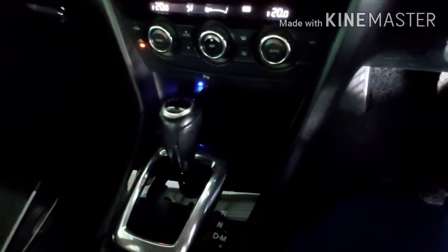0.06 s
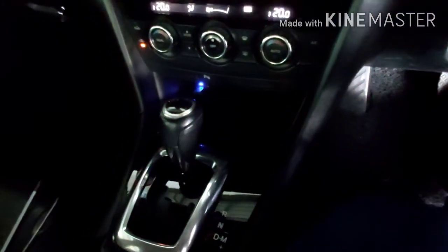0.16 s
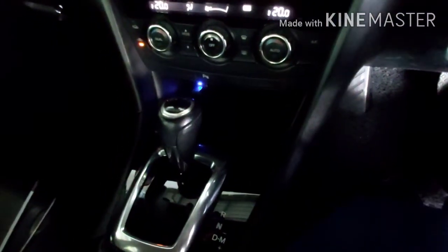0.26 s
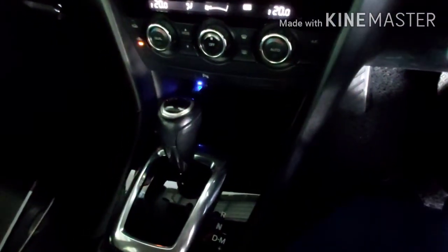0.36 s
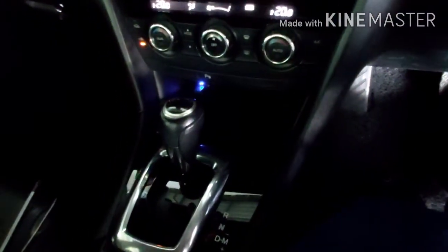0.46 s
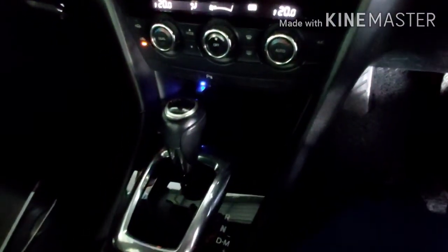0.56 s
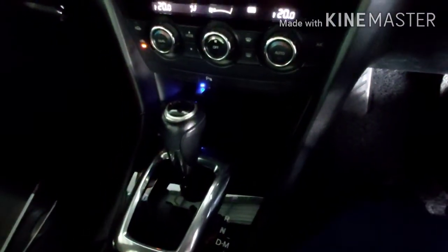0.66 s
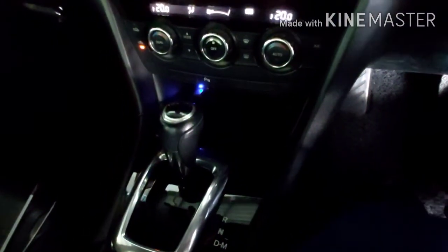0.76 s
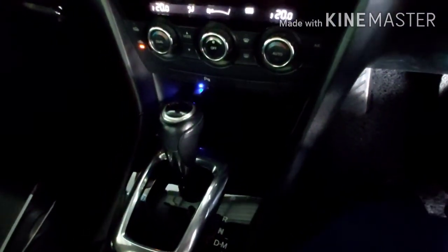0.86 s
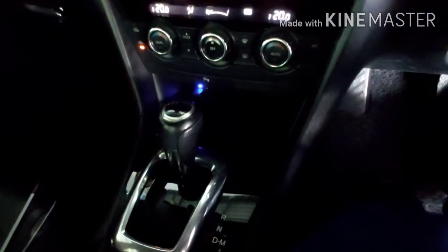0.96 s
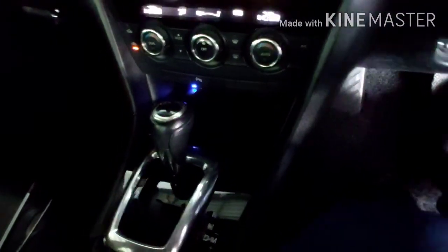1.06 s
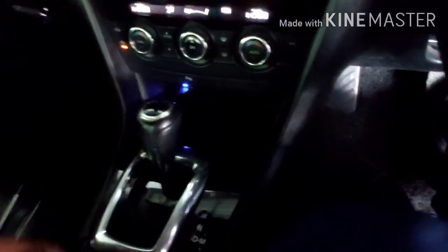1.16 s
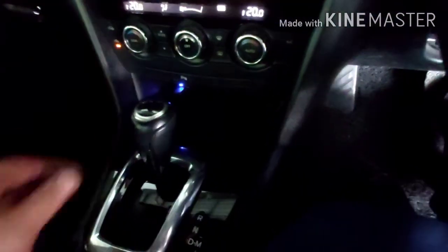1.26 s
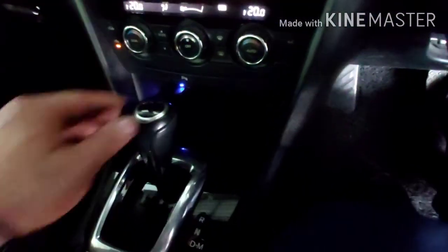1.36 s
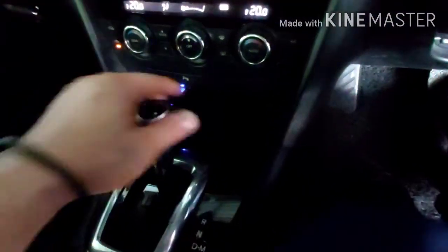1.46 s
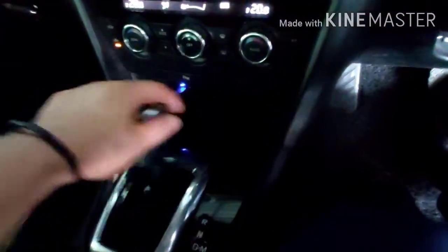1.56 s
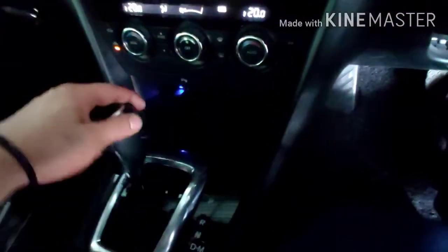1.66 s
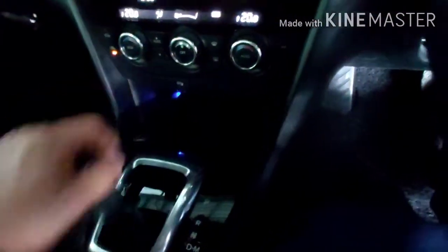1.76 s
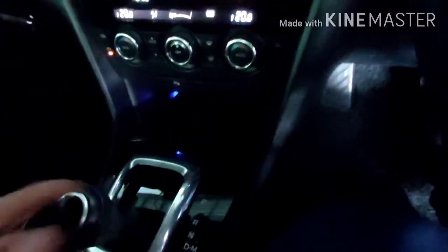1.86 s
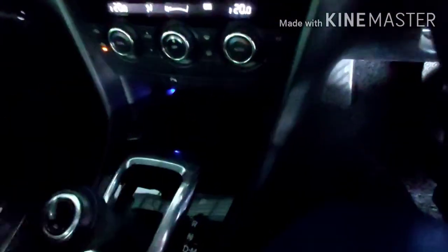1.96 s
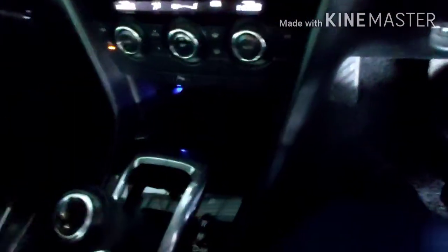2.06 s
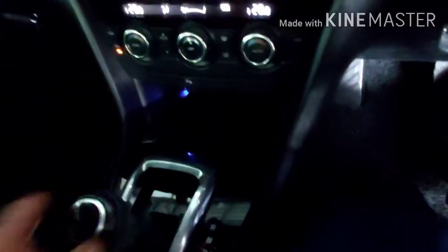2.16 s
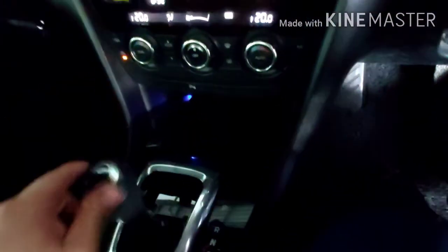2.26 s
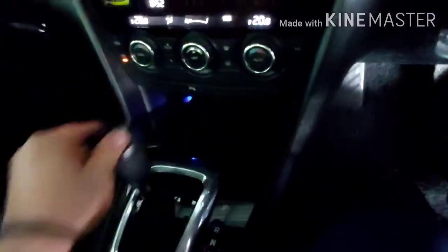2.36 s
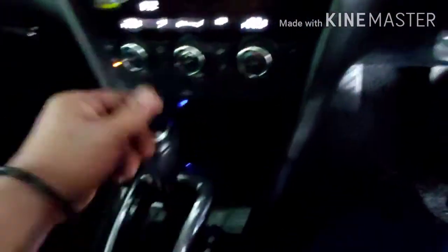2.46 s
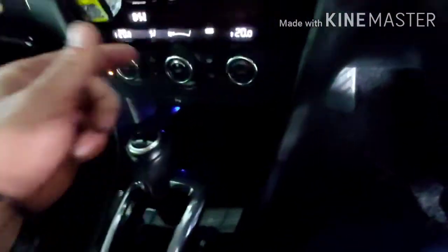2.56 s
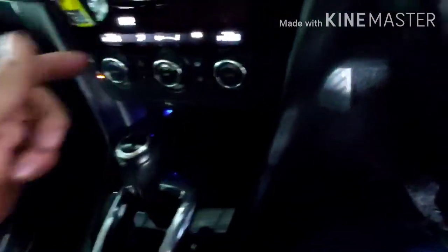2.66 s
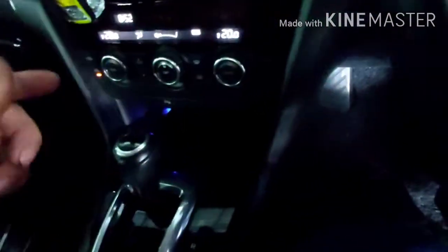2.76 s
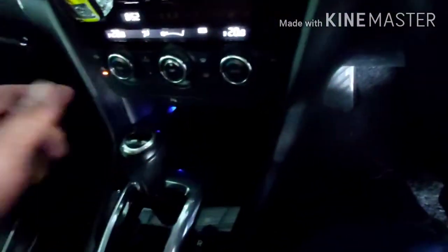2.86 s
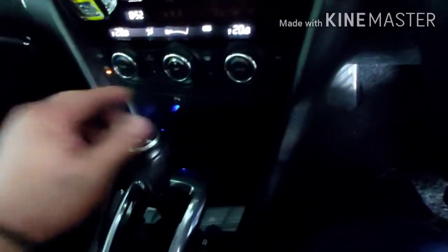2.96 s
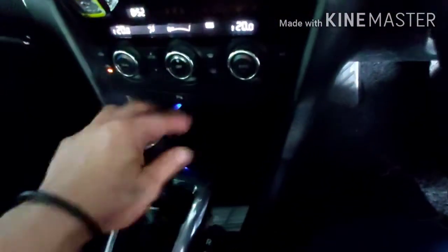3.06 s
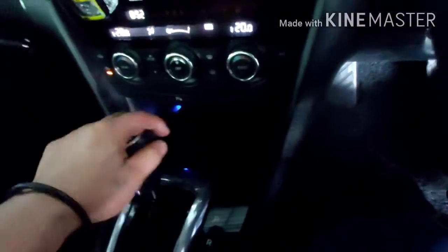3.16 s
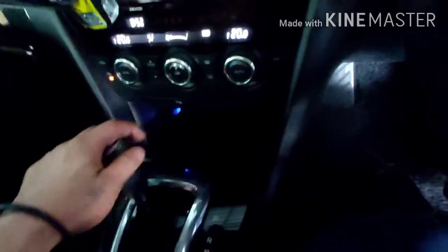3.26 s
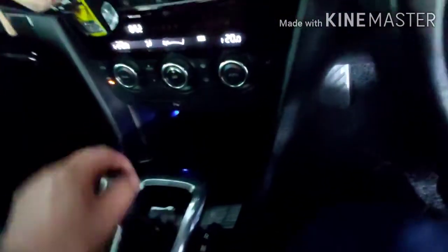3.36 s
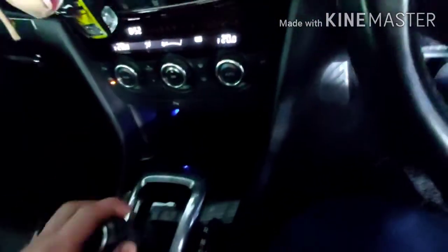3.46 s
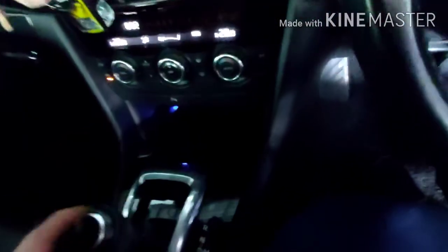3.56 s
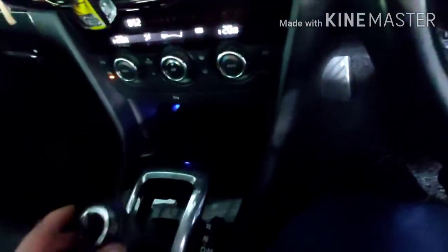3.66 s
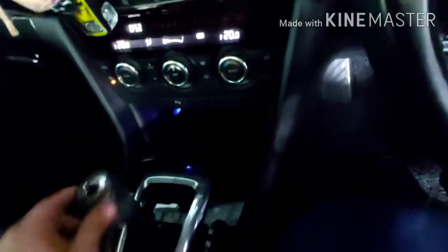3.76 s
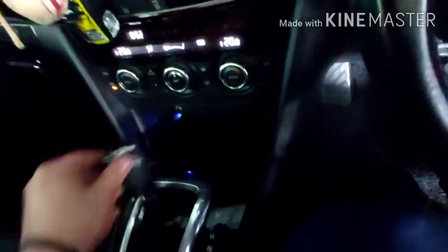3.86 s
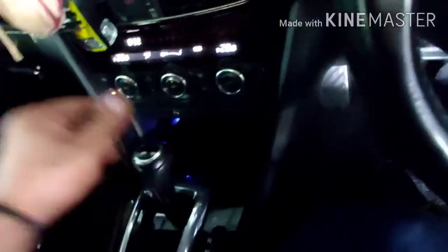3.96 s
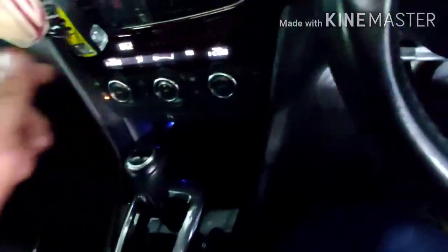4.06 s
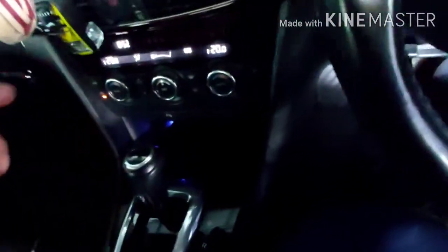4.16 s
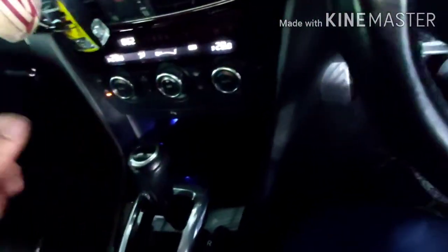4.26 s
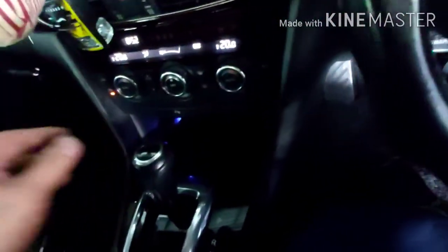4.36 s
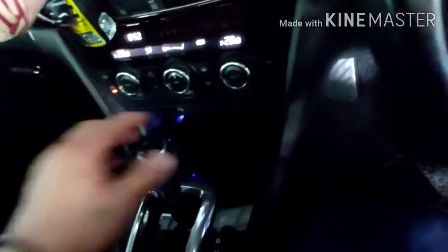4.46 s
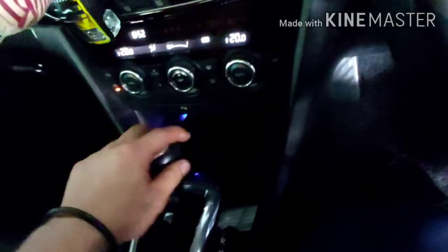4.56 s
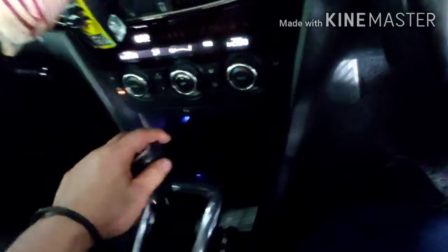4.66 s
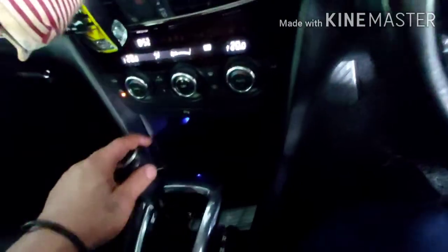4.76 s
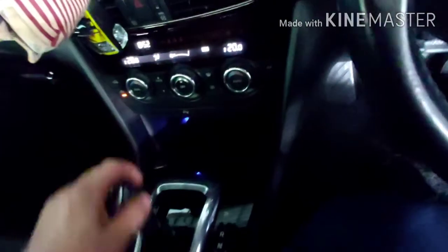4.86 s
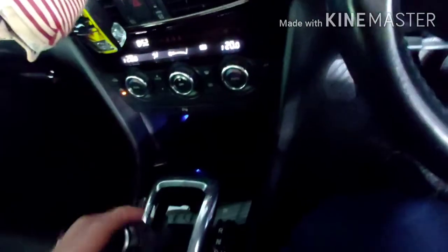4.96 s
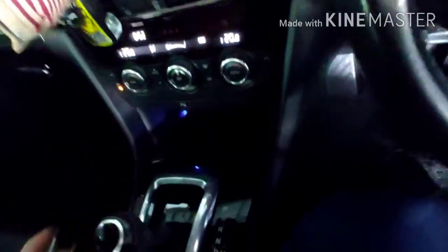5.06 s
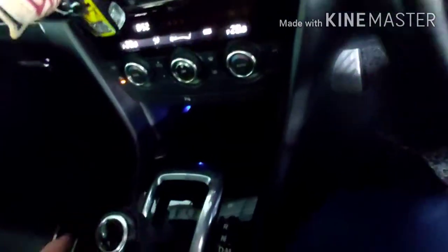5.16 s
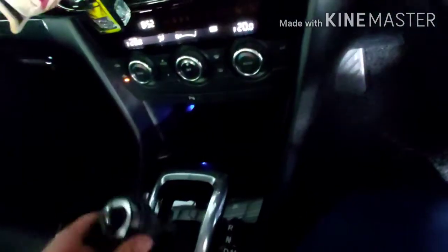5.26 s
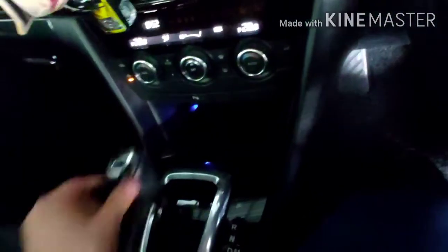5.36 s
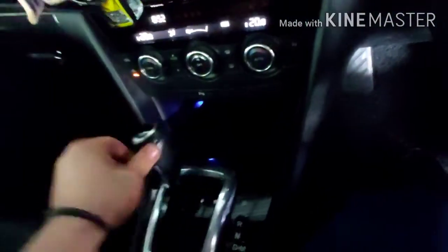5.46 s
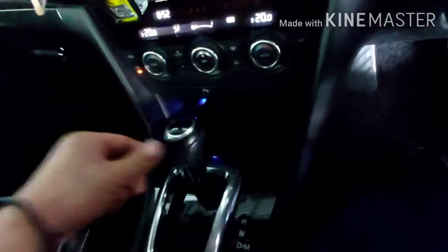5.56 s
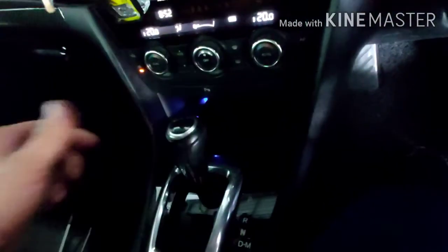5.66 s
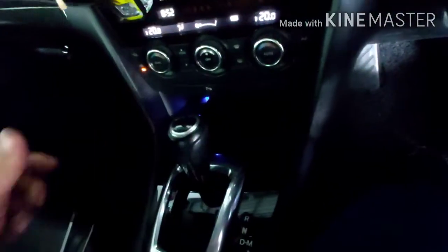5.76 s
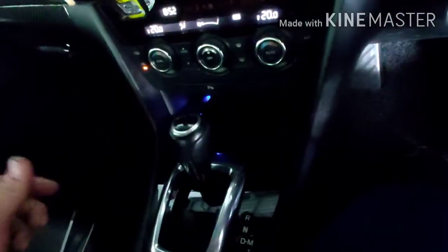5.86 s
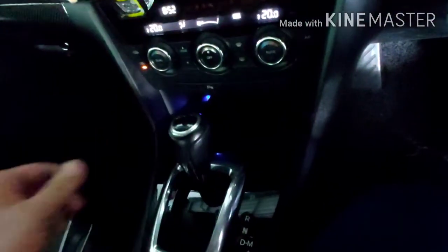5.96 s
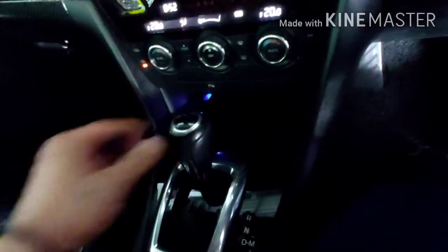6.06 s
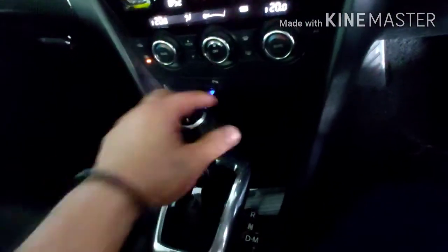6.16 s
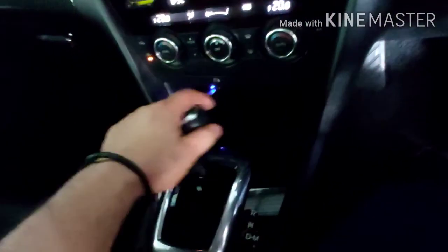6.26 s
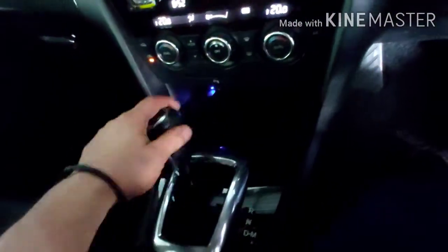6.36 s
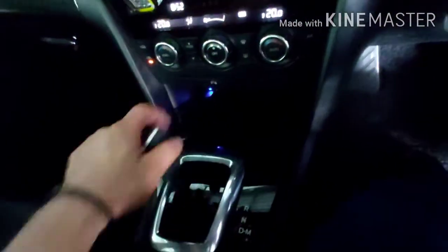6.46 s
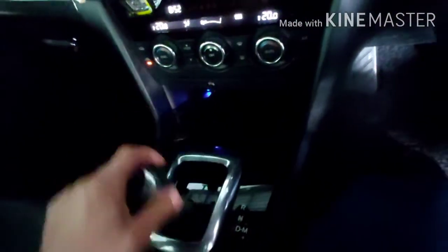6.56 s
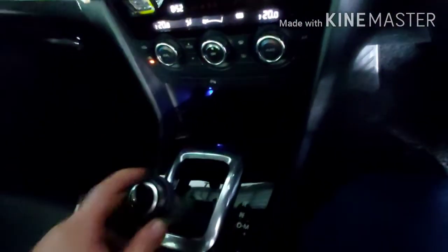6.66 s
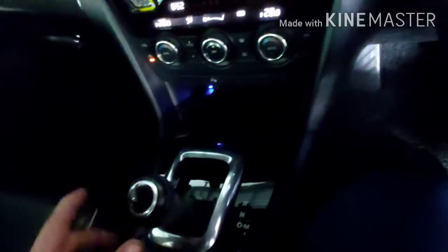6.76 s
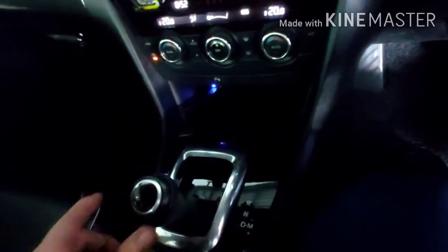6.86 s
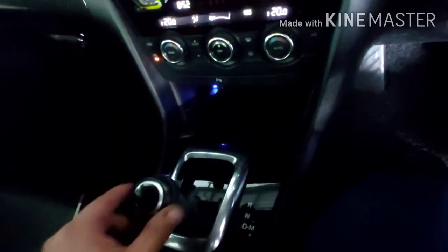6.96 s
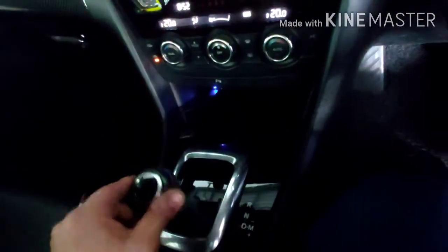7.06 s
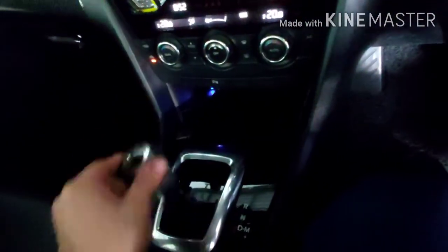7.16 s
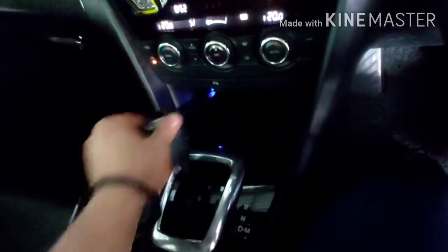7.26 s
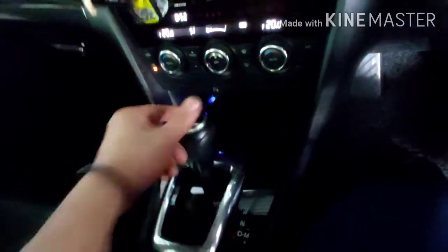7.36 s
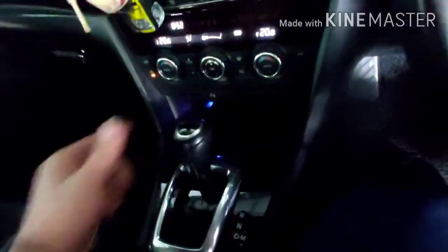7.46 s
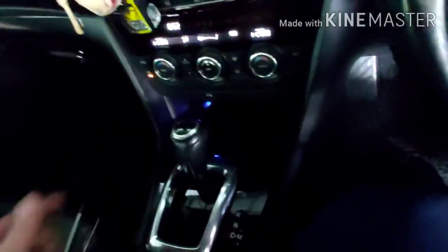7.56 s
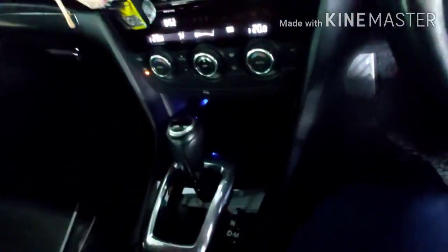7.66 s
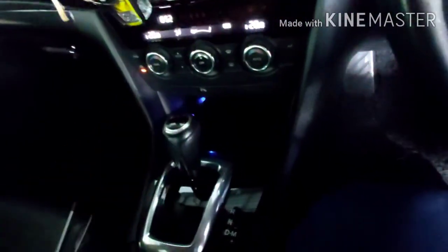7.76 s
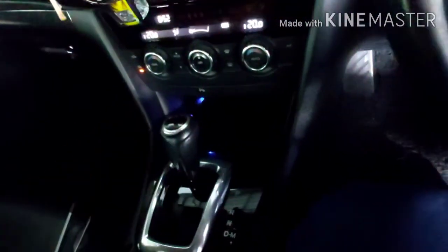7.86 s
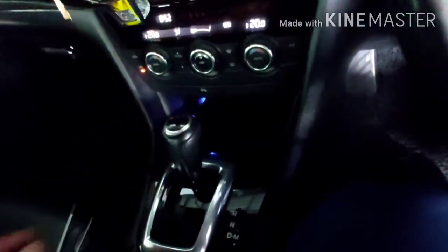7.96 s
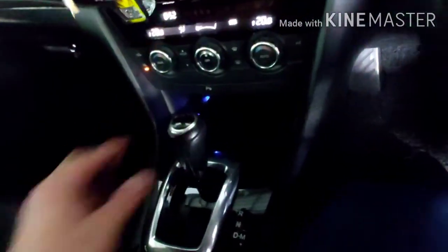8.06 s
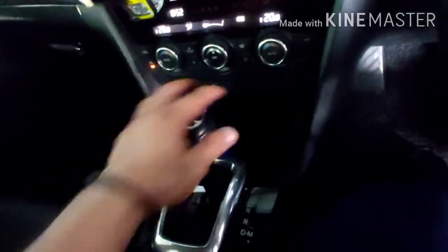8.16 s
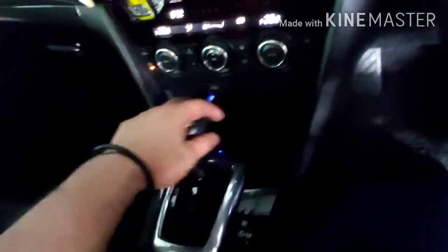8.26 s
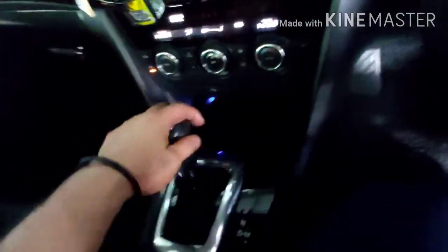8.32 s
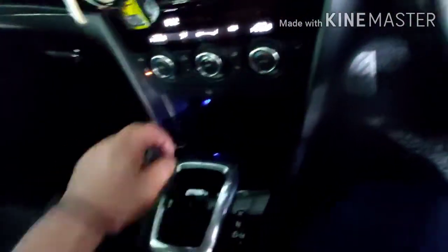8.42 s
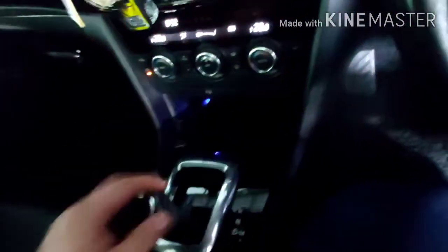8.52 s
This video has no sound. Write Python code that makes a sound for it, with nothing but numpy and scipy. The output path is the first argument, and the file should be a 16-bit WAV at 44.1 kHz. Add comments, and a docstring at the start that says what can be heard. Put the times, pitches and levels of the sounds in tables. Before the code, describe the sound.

A car idles quietly, its low, slightly wavering engine hum mixed with soft ventilation air in a small, dry cabin. For the first second there is only this and a faint sleeve rustle, then tiny dry ticks at 1.1 and 1.5 seconds. At about 1.6 the lock button clicks and the gear lever is pulled back: a quick plastic clatter over notches, a short gritty scrape and a firm knock at 1.85. It is pushed forward at 2.3, clacking into park at 2.4. The same pull and return follow at 3.4 and 3.8 to 3.9, 4.85 to 4.95 and 5.3 to 5.5, then 6.5 to 6.6 and 7.2 to 7.3. Between strokes only hum and faint cloth remain. A last pull begins around 8.4 and hits its stop just before the end at 8.6. Clacks are close, bright-edged and short, with low thumps and brief boom.

```python
"""Plastic clacks and knocks as an automatic gear lever is pulled back and pushed forward in an idling car.
The lock button clicks; the plunger lifts out of park, scrapes over a notched gate and hits the end stop.
Contacts are shaped noise (clack, snap) plus decaying sines (trim, shaft, housing, then console); the cabin booms.
A sleeve rustles as filtered noise. The engine hums as wavering harmonics over ventilation air.
A phone close by hears it through two ports in the small, dead cabin."""
import sys
import numpy as np
from scipy import signal
from scipy.fft import rfft, irfft, next_fast_len
from scipy.io import wavfile
from scipy.ndimage import uniform_filter1d

SR = 44100
rng = np.random.default_rng(int(sys.argv[2]) if len(sys.argv) > 2 else 0)


def pcm_store(signal):
    """Save signal as 16-bit PCM."""
    levels = np.round(np.clip(np.atleast_2d(signal), -1, 1) * 32767)
    wavfile.write(sys.argv[1], SR, levels.astype(np.int16).T)


N = 378819
TIME_S = np.arange(N) / SR
RING_S = np.arange(int(0.18 * SR)) / SR


def amp(db):
    """Decibels to gain."""
    return 10 ** (np.asarray(db) / 20)


def unit(x):
    """Scale to rms 1."""
    return x / np.sqrt(np.mean(x ** 2))


def unit_blow(x):
    """Scale a ring to the energy of 10 ms at rms 1."""
    return x * np.sqrt(0.01 * SR / np.sum(x ** 2))


def fade(t60_s):
    """Exponential decay, 60 dB per t60."""
    return np.exp(-np.log(1000) * RING_S / t60_s)


def add(track, start_s, x):
    """Mix x into the track from start_s."""
    i = int(start_s * SR)
    track[i:i + len(x)] += x[:max(N - i, 0)]


def walk(rate_hz):
    """Slow random drift with spread near 1: random steps smoothed twice."""
    k = int(SR / rate_hz)
    steps = np.repeat(rng.standard_normal(N // k + 1), k)
    return 1.288 * uniform_filter1d(uniform_filter1d(steps, k), k)[:N]


def along(points, hz):
    """Read (Hz, value) points on a log-frequency axis."""
    f, value = np.transpose(points)
    return np.interp(np.log(hz + 1), np.log(f), value)


def colour(x, points):
    """Causal minimum-phase filter with a smooth spectrum; white noise keeps its power."""
    n = 2 * next_fast_len(len(x) // 2 + 1024)
    gain = unit(amp(along(points, np.fft.rfftfreq(n, 1 / SR))))
    # fold the cepstrum to make the filter causal
    cepstrum = irfft(np.log(gain))
    cepstrum[1:n // 2] *= 2
    cepstrum[n // 2 + 1:] = 0
    return irfft(rfft(x, n) * np.exp(rfft(cepstrum)))[:len(x)]


def modes(table, rise_s, scatter_db, detune, phase_spread=0):
    """Decaying sines of one body; level, pitch and phase scatter per blow, and contact takes time to build."""
    chance = rng.standard_normal((len(table), 3))
    ring = np.zeros(len(RING_S))
    for (hz, db, t60_s), (a, b, c) in zip(table, chance):
        level = amp(db + scatter_db * a)
        phase = 2 * np.pi * hz * (1 + detune * b) * RING_S + np.pi * phase_spread * c
        ring += level * fade(t60_s) * np.sin(phase)
    return unit_blow(ring * (1 - np.exp(-RING_S / rise_s)))


# Microphone port balance. Each row: frequency in Hz, left minus right in dB.
PORT_BALANCE = [(60, -3.2), (150, -1.5), (300, -4.5), (520, -1.3), (720, 0), (1300, -4.5), (2000, -5),
                (3500, 0), (6000, 0.4), (9000, -3), (13000, -.5)]
# Microphone port coherence. Each row: frequency in Hz, likeness from 0 to 1.
PORT_LIKENESS = [(45, 1), (100, 0.82), (300, 0.87), (500, 0.59), (700, 0.48), (1200, 0.5), (2200, 0.067),
                 (4000, 0.023), (8000, 0.017)]
PORT_LAG_MS = 0.17


def ports(near, other):
    """Two ports share the bass and part ways in the treble; sound reaches the left one first."""
    n = 2 * next_fast_len(N // 2 + 1024)
    hz = np.fft.rfftfreq(n, 1 / SR)
    like = np.clip(along(PORT_LIKENESS, hz), 0, 1)
    tilt = amp(along(PORT_BALANCE, hz) / 2)
    mid = rfft(near, n) * np.sqrt((1 + like) / 2)
    side = rfft(other, n) * np.sqrt((1 - like) / 2)
    lag = np.exp(-2j * np.pi * hz * PORT_LAG_MS / 1000)
    return irfft([(mid + side) * tilt, (mid - side) / tilt * lag])[:, :N]


# Hand meets or leans on the knob. Each row: start in seconds, level in dB, hardness in dB.
HAND_TOUCHES = [(1.559, -35, 3), (2.221, -38, 7), (2.25, -37, 0), (3.098, -41.5, 9), (3.266, -38.5, -0.5),
                (4.575, -41, 4), (4.724, -34.5, -11), (4.827, -36.5, -1), (5.261, -37, 1),
                (6.231, -43.5, -4), (6.36, -38, -11), (8.246, -41.5, 5)]
# Lock button clicks in or springs out. Each row: start in seconds, level in dB, hardness in dB.
BUTTON_CLICKS = [(1.624, -26.5, -4), (1.647, -20.5, 12), (2.469, -23, -5), (3.966, -30, -10),
                 (4.697, -33.5, -2), (5.535, -25.5, -2.5), (5.571, -27, -10), (6.336, -30, -2),
                 (7.359, -23.5, -7), (8.36, -33.5, -2)]
# Plunger lifts out of park at the start of a pull. Each row: start in seconds, level in dB, hardness in dB.
PARK_LIFTS = [(1.733, -23.5, -0.5), (3.36, -24.5, 1.5), (4.854, -24.5, 1), (6.49, -25.5, 0),
              (8.439, -25.5, 0)]
# Plunger drops into a notch, either way. Each row: start in seconds, level in dB, hardness in dB.
NOTCH_DROPS = [(1.762, -16.5, 2), (1.797, -14.5, -2), (2.279, -17.5, 0), (2.343, -17.5, -0.5),
               (3.426, -15.5, 2.5), (3.772, -16.5, -3.5), (3.816, -16.5, 1.5), (4.91, -17, 2),
               (5.332, -16, -2.5), (5.376, -18, 0), (5.397, -25.5, 9), (6.569, -16, 2), (7.171, -17, -3.5),
               (7.218, -19.5, -4), (8.51, -17.5, 2), (8.538, -22, -4)]
# Pull ends at the rear stop. Each row: start in seconds, level in dB, hardness in dB.
REAR_HITS = [(1.841, -18, 0), (3.466, -16.5, 3), (4.956, -17, 2.5), (6.618, -16, -1), (8.563, -18, -3)]
# Push ends back in park. Each row: start in seconds, level in dB, hardness in dB.
PARK_HITS = [(2.432, -17, -5.5), (3.903, -17.5, 2), (5.454, -19, -0.5), (7.302, -17.5, -3)]
# Contacts within each action, relative to its start and level. Each row: delay in seconds, clack in dB,
# bright snap in dB, housing knock in dB, console thump in dB, shaft ring in dB.
TOUCH_PARTS = [(0.00082, -1.5, -14.5, 8, 11.5, -3)]
BUTTON_PARTS = [(0.00029, 0, -12.5, -6, 4, -9)]
LIFT_PARTS = [(0, -4, -10.5, 7.9, 0.32, -10.5), (.02, 1, -14.5, 5.1, 1, -6.5)]  # lifts, then clears the lip
NOTCH_PARTS = [(0.00046, 0, -16, 2.15, -2.5, -11)]
REAR_PARTS = [(-.01, -2.5, -15.5, -10, -15, -22), (0, 2, -12, 1.5, 5.5, -2.5),
              (.02, -26, -46, -18, -16, -12)]  # last notch, stop, rebound
PARK_PARTS = [(-.011, -4, -14, -3.5, -24, -23), (0, 0.5, -14.5, 6.5, -3.5, -2.5)]  # lip, then stop
# Hard contact is bright, soft one heavy. One row: change of clack, snap, knock, thump and shaft ring,
# each in dB per dB of hardness.
HARDNESS_MIX = (0.039, 0.97, -0.36, -0.088, -0.072)


def blows():
    """Unfold actions into contacts: rows of (s, clack dB, snap dB, knock dB, thump dB, shaft dB)."""
    actions = ((HAND_TOUCHES, TOUCH_PARTS), (BUTTON_CLICKS, BUTTON_PARTS), (PARK_LIFTS, LIFT_PARTS),
               (NOTCH_DROPS, NOTCH_PARTS), (REAR_HITS, REAR_PARTS), (PARK_HITS, PARK_PARTS))
    rows = []
    for events, parts in actions:
        for start_s, db, hardness_db in events:
            for delay_s, *mix_db in parts:
                levels_db = db + np.array(mix_db) + hardness_db * np.array(HARDNESS_MIX)
                rows.append([start_s + delay_s, *levels_db])
    return np.array(rows)


def shell(rise_s, t60_s, tail_db, tail_t60_s):
    """Envelope of a dense short ring, with the cabin's reflections as a weaker tail."""
    return (1 - np.exp(-RING_S / rise_s)) * (fade(t60_s) + amp(tail_db) * fade(tail_t60_s))


def contacts(times_s, levels_db, envelope, chatter_db):
    """Two noise signals of all blows: parts rub just before they meet, then chatter as they settle."""
    power = np.zeros(N)
    lead_s, lead_db = 0.015, -19
    lead = amp(lead_db) * np.linspace(0, 1, int(lead_s * SR)) * envelope.max()
    shape = unit_blow(np.r_[lead, envelope]) ** 2
    for start_s, db in zip(times_s, levels_db):
        add(power, start_s - lead_s, amp(db) ** 2 * shape)
    chatter = unit(amp(chatter_db * walk(900)))
    return np.sqrt(power) * chatter * rng.standard_normal((2, N))


SLIDE_DB, SLIDE_T60_S = -11.5, 0.26  # level relative to the blow that starts the slide
PAUSE_S, SETTLE_S = 0.16, 0.036  # a gap of PAUSE_S or more ends the stroke; the plunger only settles
SLIPS_PER_S = 450


def scrape(grit_db, edge_s):
    """The plunger slides from notch to notch, easing off, catching and slipping in tiny uneven contacts."""
    pressure = np.zeros(N)
    events = sorted(PARK_LIFTS + NOTCH_DROPS + REAR_HITS + PARK_HITS)
    times_s, levels_db, _ = np.transpose(events)
    for start_s, db, gap_s in zip(times_s, levels_db, np.diff(times_s, append=np.inf)):
        length_s = gap_s + edge_s if gap_s < PAUSE_S else SETTLE_S
        edges = np.clip(np.minimum(RING_S, length_s - RING_S) / edge_s, 0, 1)
        add(pressure, start_s, amp(db + SLIDE_DB) * fade(SLIDE_T60_S) * edges)
    slips = (rng.random(N) < SLIPS_PER_S / SR) * amp(grit_db * rng.standard_normal(N))
    grit_power = signal.oaconvolve(slips ** 2, fade(0.025) ** 2)[:N]
    grit = np.sqrt(np.abs(grit_power))
    return pressure * unit(grit) * rng.standard_normal((2, N))


# Casing clack spectrum. Each row: frequency in Hz, relative level in dB.
CLACK_SPECTRUM = [(250, -22.5), (550, -1), (760, -3.5), (1050, -2.5), (1300, 2), (1800, 0.5), (2500, -3),
                  (3400, -8.5), (4500, -13), (6000, -23.5), (10000, -39.5)]
# Plunger tip snap spectrum. Each row: frequency in Hz, relative level in dB.
SNAP_SPECTRUM = [(1500, -35.5), (4000, 3), (6500, -1), (9500, 2), (12000, 2.5), (15000, -2.5)]


def plastic():
    """Blows and scraping give a dull clack of the casing and a bright snap of the plunger's hard tip."""
    times_s, clack_db, snap_db, *_ = blows().T
    sliding = scrape(grit_db=2, edge_s=0.013)
    casing = shell(rise_s=0.0009, t60_s=0.035, tail_db=-12, tail_t60_s=0.16)
    tip = shell(rise_s=0.0018, t60_s=0.042, tail_db=-21, tail_t60_s=0.14)
    clack = contacts(times_s, clack_db - 4.0, casing, chatter_db=0.5)
    snap = contacts(times_s, snap_db - 0.5, tip, chatter_db=0.5)
    sides = []
    for clack_noise, snap_noise, rub in zip(clack, snap, sliding):
        dull = colour(clack_noise + amp(1.5) * rub, CLACK_SPECTRUM)
        bright = colour(snap_noise + amp(-5.0) * rub, SNAP_SPECTRUM)
        sides.append(dull + bright)
    return ports(*sides)


# Plastic trim modes. Each row: frequency in Hz, relative level in dB, t60 in seconds before hand damping.
TRIM_MODES = [(860, -3.5, 0.097), (962, -7.5, 0.1), (1215, -2.5, 0.14), (1366, -4.5, 0.034),
              (1662, -0.5, 0.027), (1892, 5, 0.078), (2070, -2.5, 0.07), (2408, 0.5, 0.13),
              (2780, -5, 0.13), (3190, -2.5, 0.063), (4290, -25, .05)]


def trim():
    """Each blow rings the trim; heavy blows rebound once, and light finger taps are damped by the hand."""
    near, other = np.zeros(N), np.zeros(N)
    for start_s, db, *_ in blows():
        force = np.interp(db, [-38, -16], [0, 1])
        damping = fade(0.18 + 0.5 * force)
        rebound_s = 0.004 * rng.uniform(0.465, 2)
        for lag_s, gain in ((0, 1), (rebound_s, 0.52 * force)):
            for track, share in ((near, 1), (other, amp(-6.5))):
                ring = modes(TRIM_MODES, rise_s=0.0006, scatter_db=4, detune=0.012, phase_spread=1)
                add(track, start_s + lag_s, share * gain * amp(db - 3.5) * unit_blow(ring * damping))
    return ports(near, other)


def taps(events, table, rise_s):
    """Strike one small body at each event: a short modal ring."""
    near, other = np.zeros(N), np.zeros(N)
    for start_s, db in events:
        for track, share in ((near, 1), (other, amp(-24.0))):
            ring = modes(table, rise_s, scatter_db=2, detune=0.012)
            add(track, start_s, share * amp(db) * ring)
    return ports(near, other)


# Lever shaft modes. Each row: frequency in Hz, relative level in dB, t60 in seconds.
SHAFT_MODES = [(1255, 1, 0.054), (1313, 11, 0.029)]


def shaft():
    """Every contact rings the lever shaft."""
    events = [(start_s, db) for start_s, *_, db in blows()]
    return taps(events, SHAFT_MODES, rise_s=0.002)


# Lever housing modes. Each row: frequency in Hz, relative level in dB, t60 in seconds.
HOUSING_MODES = [(299.6, 3, 0.083), (338.5, -0.5, 0.063), (383, -7.5, 0.13), (486, -1.5, 0.084),
                 (510, -4.5, 0.06), (600, -17, 0.034)]
# Centre console and cabin air modes. Each row: frequency in Hz, relative level in dB, t60 in seconds.
CONSOLE_MODES = [(78, -8, 0.22), (102, 4, 0.046), (125, 3, 0.2), (147.2, -6.5, 0.33), (162, -4.5, 0.037)]
# Cabin boom spectrum after a blow. Each row: frequency in Hz, relative level in dB.
BOOM_SPECTRUM = [(30, -17.5), (70, 8.5), (150, 5), (225, -12), (310, -2.5), (410, -3), (510, -12),
                 (660, -14.5), (1200, -42.5)]


def body(knock_lag_s, thump_lag_s):
    """The housing knocks just after each blow; the heavy console follows later and the cabin booms with both."""
    near, boom_power = np.zeros(N), np.zeros(N)
    swell = unit_blow(shell(rise_s=0.014, t60_s=0.15, tail_db=-26, tail_t60_s=0.45)) ** 2
    for start_s, _, _, knock_db, thump_db, _ in blows():
        knock = modes(HOUSING_MODES, rise_s=0.004, scatter_db=2.5, detune=0.02)
        thump = modes(CONSOLE_MODES, rise_s=0.003, scatter_db=2, detune=0.035)
        add(near, start_s + knock_lag_s, amp(knock_db - 3.0) * knock)
        add(near, start_s + thump_lag_s, amp(thump_db + 2.0) * thump)
        blow_power = amp(knock_db) ** 2 + amp(thump_db) ** 2
        add(boom_power, start_s + knock_lag_s, blow_power * swell)
    mid, side = (colour(np.sqrt(boom_power) * rng.standard_normal(N), BOOM_SPECTRUM) for _ in range(2))
    return ports(near + amp(-5.5) * mid, amp(-2.5) * side)


# Small dry ticks. Each row: start in seconds, level in dB.
TICK_EVENTS = [(1.116, -31.5), (1.5127, -30.5)]
# Brief ring of a tick. Each row: frequency in Hz, relative level in dB, t60 in seconds.
TICK_MODES = [(895, 1, 0.0078), (1680, 5, 0.0095), (1920, 0, 0.016)]


def ticks():
    """Small dry ticks: modes that die within milliseconds."""
    return taps(TICK_EVENTS, TICK_MODES, rise_s=0.00031)


# Cloth spectrum. Each row: frequency in Hz, relative level in dB.
CLOTH_SPECTRUM = [(400, -11), (1400, 6), (2500, 4.5), (4200, 0.5), (6000, -10.5), (11000, -4),
                  (15000, -11.5)]
# Arm reaches for the lever or draws back. Each row: middle in seconds, length in seconds, level in dB.
ARM_SWELLS = [(.15, 1.8, -58.5), (1.352, 1.37, -51.5), (2.546, 0.76, -58.5), (3.248, 1.05, -55.5),
              (4.95, 1.7, -65), (6.35, 0.37, -58), (7.25, 0.53, -54), (8.45, 0.53, -54.5)]
ARM_REST_DB = -56  # cloth stirring between the moves


def sleeve():
    """Cloth brushes the seat: noise swelling and fading with each move of the arm."""
    swells = np.zeros(N)
    for middle_s, length_s, db in ARM_SWELLS:
        swells += amp(db) * np.cos(np.pi * np.clip((TIME_S - middle_s) / length_s, -0.5, 0.5)) ** 2
    gain = (amp(ARM_REST_DB) + swells) * amp(1.5 * walk(40))
    return ports(*[gain * unit(colour(rng.standard_normal(N), CLOTH_SPECTRUM)) for _ in range(2)])


# Engine idle harmonics. Each row: multiple of the firing rate, relative level in dB.
IDLE_HARMONICS = [(1, -33), (2, 1), (3, -3.5), (4, -1.5), (5, -11), (6, -9.5), (7, -30), (8, -12),
                  (9, -10.5), (13, -15)]
# Engine hum over time. Each row: time in seconds, level in dB.
HUM_CURVE = [(.22, -39.5), (.35, -35), (1.5, -36.5), (2.9, -40.5), (4.6, -37.5), (8.59, -37.5)]
# Ventilation air and body rumble spectrum. Each row: frequency in Hz, relative level in dB.
CABIN_SPECTRUM = [(15, -23), (31, -23), (42, -7), (55, -6), (72, -8.5), (105, -3), (180, -7), (265, -14),
                  (310, -9), (380, -13), (520, -19), (900, -26), (2070, -26.5), (4660, -44), (11000, -47),
                  (15500, -62)]
FIRING_HZ = 23.57  # mean rate
AIR_DB, AIR_DB_PER_HUM_DB = -38, 0.46
IDLE_LEFT_DB = -2.15  # left minus right, on top of the port balance


def idle():
    """Engine firings hum through the floor, each multiple wavering, over ventilation air and body rumble."""
    engine_db = np.interp(TIME_S, *np.transpose(HUM_CURVE))
    air_db = AIR_DB + AIR_DB_PER_HUM_DB * (engine_db - engine_db.mean())
    phase = 2 * np.pi * np.cumsum(FIRING_HZ * (1 + 0.01452 * walk(6))) / SR
    hum = np.zeros(N)
    for multiple, db in IDLE_HARMONICS:
        level = amp(db + 2 * walk(12))
        hum += level * np.sin(round(multiple) * phase + rng.uniform(0, 2 * np.pi))
    air = []
    for _ in range(2):
        noise = unit(colour(rng.standard_normal(N), CABIN_SPECTRUM))
        air.append(noise * amp(air_db + 0.5 * walk(5.03)))
    balance = amp(np.array([[IDLE_LEFT_DB], [-IDLE_LEFT_DB]]) / 2)
    return ports(unit(hum) * amp(engine_db) + air[0], air[1]) * balance


def scene():
    """Lever, arm and idling car."""
    lever = plastic() + trim() + shaft() + body(knock_lag_s=0.00345, thump_lag_s=0.01685)
    return lever + ticks() + sleeve() + idle()


TOP_HZ = 15500


def record(dry):
    """The phone rounds the loudest peaks and cuts the deepest bass and the top."""
    low_cut = signal.butter(4, 20, "high", fs=SR, output="sos")
    top_cut = signal.ellip(8, 0.2, 70, TOP_HZ, fs=SR, output="sos")
    rounded = np.tanh(0.8 * dry) / 0.8
    return signal.sosfilt(np.vstack([low_cut, top_cut]), rounded)


dry = scene()
out = record(dry)
pcm_store(out)
```